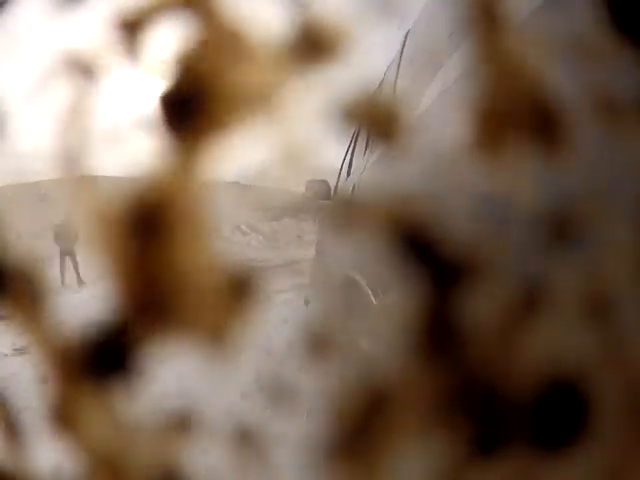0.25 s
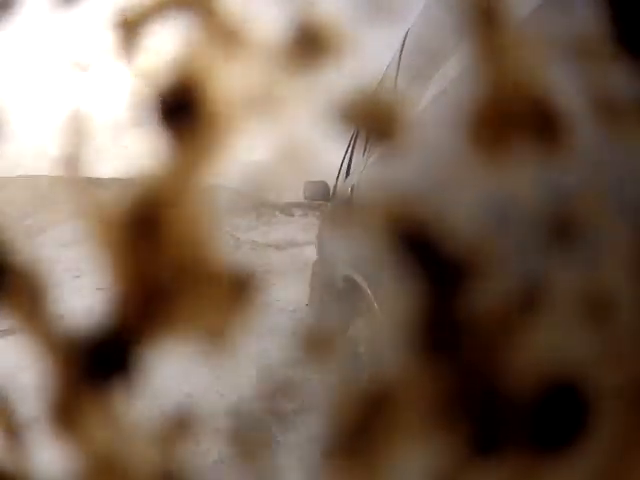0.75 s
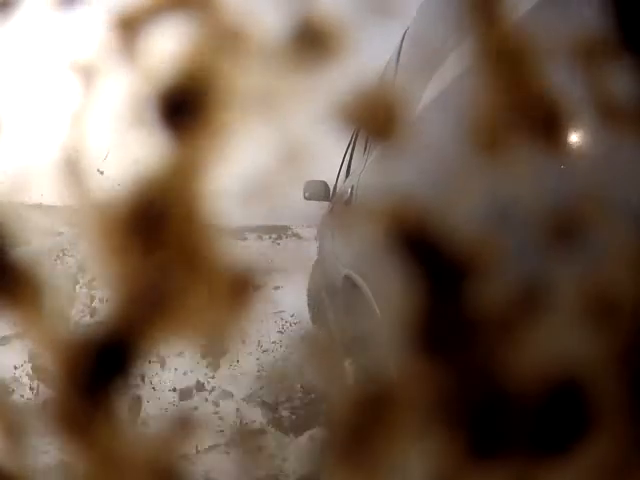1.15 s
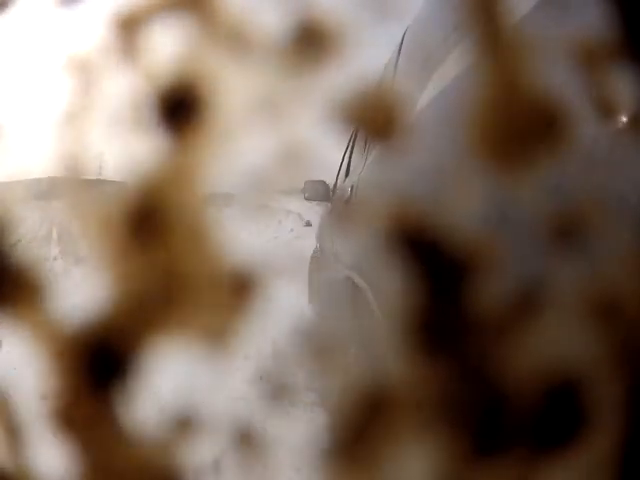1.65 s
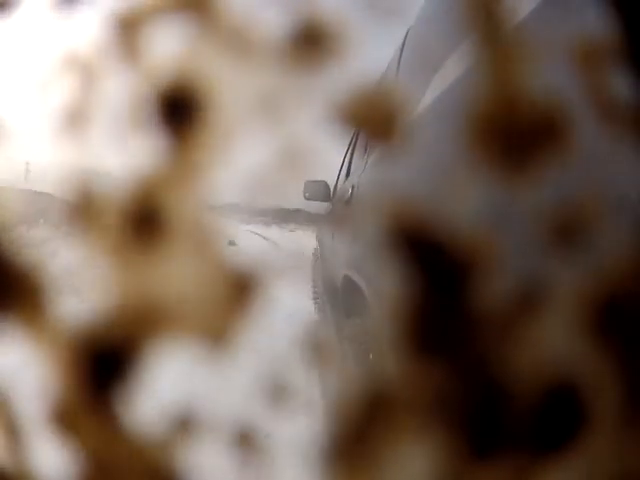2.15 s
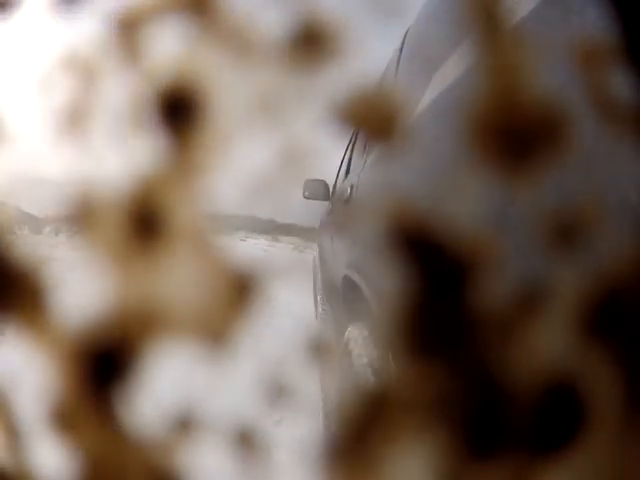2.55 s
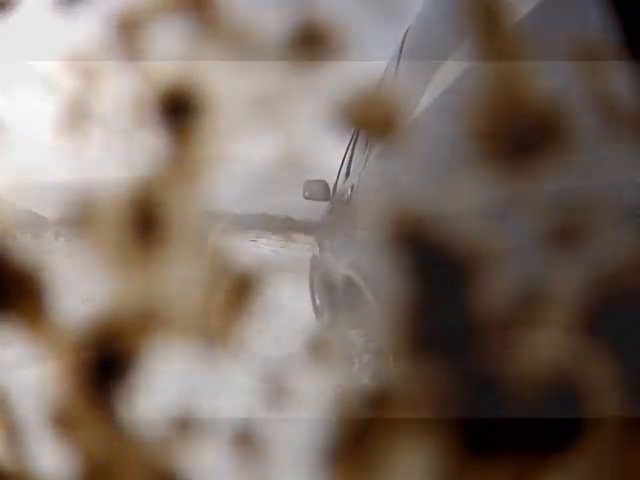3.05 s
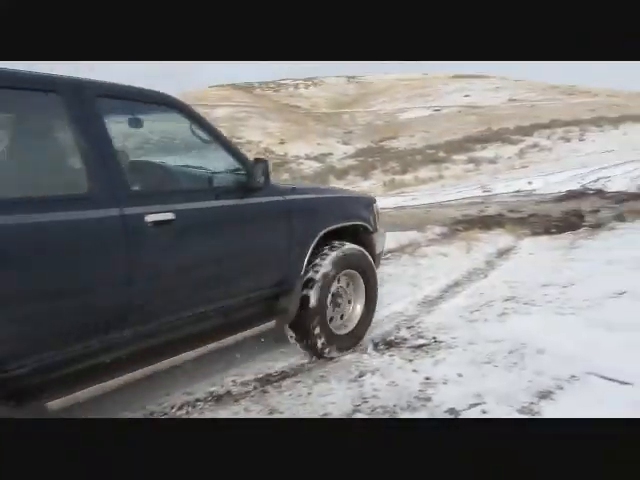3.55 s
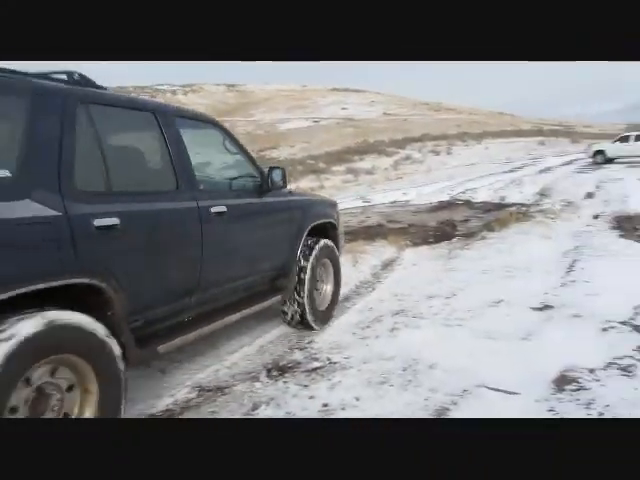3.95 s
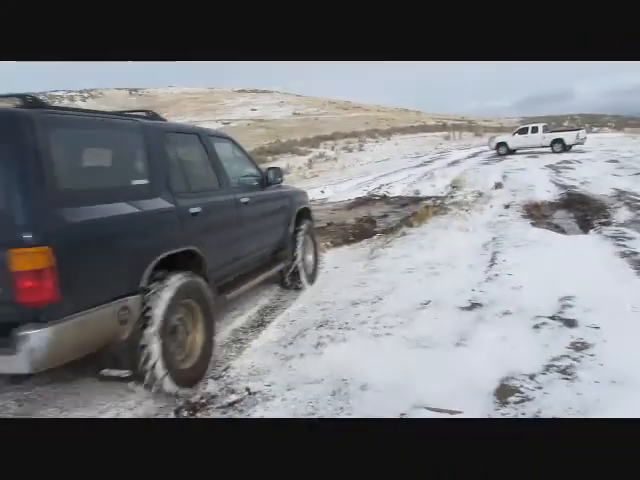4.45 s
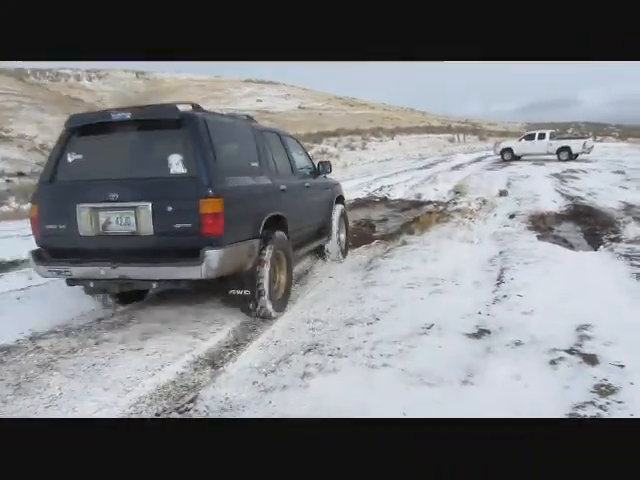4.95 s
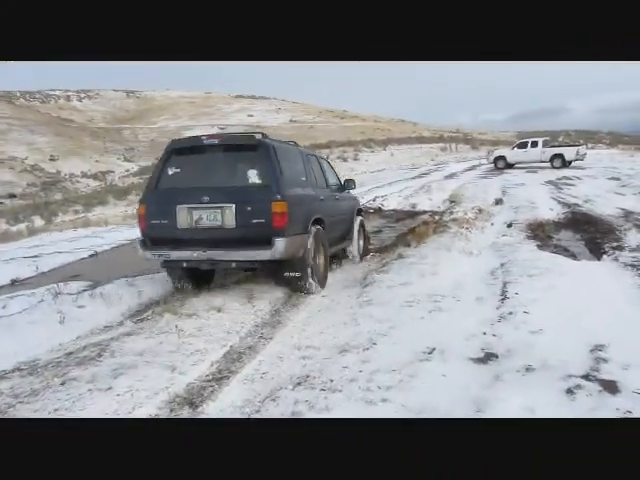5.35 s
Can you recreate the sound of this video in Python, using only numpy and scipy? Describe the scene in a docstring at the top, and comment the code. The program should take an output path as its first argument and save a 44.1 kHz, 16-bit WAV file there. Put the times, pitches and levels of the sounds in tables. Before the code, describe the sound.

A truck ploughs through a mud hole, heard from a boxy microphone mounted on it: resonant rattles, clods thudding, slurry ringing the walls and overloaded bumps in mono. It calms, then a clearer, slightly wide trackside microphone catches tyre roar, slushy hiss, a tiny squeak, belt whirr and the engine pulling away with rising pitch.

```python
"""In a sealed case fixed to a truck's side, then in open air beside the track: a truck ploughs through a mud hole.
On board, swaying noise and an engine drone come through the mount; filtered noise and decaying rings
make the spray, the clods of mud and the rattling case.
Beside the track, coloured noise makes the tyres' roar and slush, with squeaks and a belt whirr; sine tones locked
to the crank make the six-cylinder exhaust, which rises in pitch as the truck pulls away."""
import sys
import numpy as np
from scipy import signal
from scipy.fft import rfft, irfft, next_fast_len
from scipy.io import wavfile
from scipy.ndimage import uniform_filter1d

SR = 44100
rng = np.random.default_rng(int(sys.argv[2]) if len(sys.argv) > 2 else 0)


def output_pcm(signal):
    """Save a mono or channel-first signal as 16-bit PCM at the path in sys.argv[1].

    Samples are clipped to [-1, 1] before scaling.
    """
    pcm = np.clip(np.atleast_2d(signal).T, -1, 1) * 32767
    wavfile.write(sys.argv[1], SR, np.round(pcm).astype(np.int16))


N = 247842

# How hard the ground shakes the truck: t/s, mount sway level/dB, engine drone level/dB, body rumble level/dB
RIDE_LEVELS = [(0, -20.5, -30, -29), (.35, -26, -19.5, -36.5), (.62, -38, -22.5, -40),
               (.8, -16.5, -21.5, -30.5), (1.5, -23, -26, -31.5), (1.85, -19.5, -18.5, -28.5),
               (2.15, -19.5, -22, -40.5), (2.6, -30.5, -32, -49.5), (3.15, -31.5, -37.5, -55),
               (3.4, -45.5, -53.5, -51)]
# Body rumble heard through the mount, its tone colour: f/Hz, relative level/dB
BODY_COLOUR = [(40, -45), (85, 12), (110, -1.5), (140, 0), (180, -9.5), (225, -7), (290, -4.5), (315, -4),
               (350, 0.5), (410, -16), (700, -16.5), (1200, -35.5)]
# Jolts of the suspension: t/s, slow lurch level/dB, boom level/dB
SUSPENSION_JOLTS = [(0.241, -37, -15.5), (0.762, -14.5, -40), (.89, -19, -9), (.995, -7, -6),
                    (1.172, -5, -14), (1.411, -34, -9.5), (1.531, -10.5, -42), (1.629, -17, -13.5),
                    (1.711, -24, -9), (1.808, -27, -17), (2.088, -14, -16), (2.5, -52, -23)]
# Groans and squeals of the flexing mount and case: t/s, length/s, f/Hz, width/Hz, level/dB
MOUNT_GROANS = [(.57, 0.34, 121, 25, -29.5), (1.70, 0.069, 158, 130, -27), (1.885, 0.072, 104, 35, -23.5),
                (1.89, 0.053, 172, 70, -28.5), (2.097, 0.013, 1850, 50, -16.5),
                (2.345, 0.032, 1462, 35, -40.5), (2.99, 0.043, 348, 40, -45)]
# Spray through the mud hole: t/s, level/dB before the case colours it
SPRAY_LEVELS = [(0, -29), (.28, -32.5), (.58, -38), (.9, -34), (1.5, -36.5), (1.88, -26.5), (2.16, -36.5),
                (2.26, -47), (2.75, -58), (3.17, -66)]
# Resonances of the case: f/Hz, width/Hz, relative level/dB
CASE_RESONANCES = [(332, 50, -0.5), (772, 68, -5), (1200, 200, -3.5), (1439, 214, -1.5), (1849, 110, -2),
                   (1966, 150, -2), (2374, 440, -5.5), (3050, 203, -7.5), (3554, 270, -4.5),
                   (3740, 120, -26), (5070, 860, -25.5), (6700, 1500, -25), (8520, 220, -10),
                   (7940, 120, -19.5), (9340, 190, -15.5), (10100, 190, -14), (10530, 97, -14),
                   (11340, 120, -35), (13350, 170, -14.5), (14000, 190, -19.5), (14200, 300, -29.5),
                   (15200, 450, -19.5)]
# Wall modes that ring longest: f/Hz, width/Hz, relative level/dB
WALL_MODES = [(1220, 55, -9), (1340, 40, -6), (1460, 36, -3), (1852, 30, 5), (2010, 50, -2), (2470, 55, -6),
              (2570, 45, -7), (3030, 45, -8), (3190, 45, -9), (3585, 55, -3), (3810, 55, -8),
              (8400, 100, -9), (8800, 100, -16), (9440, 80, -17), (10140, 50, -9), (13870, 55, -12)]
# Gushes of slurry that keep the case ringing: t/s, length/s, level/dB before colouring
SLURRY_GUSHES = [(1.261, 0.069, -29.5), (1.349, 0.049, -30.5), (1.723, 0.012, -27), (1.776, 0.011, -29),
                 (1.873, 0.027, -22.5), (1.942, 0.036, -18.5), (2.013, 0.0077, -11.5), (2.025, 0.021, -23),
                 (2.073, 0.048, -20), (2.118, 0.067, -21.5), (2.296, 0.087, -40.5), (2.919, 0.034, -50.5),
                 (2.956, 0.034, -46.5), (2.995, 0.032, -46.5)]
# Hardest knocks of the case on its mount: t/s, level/dB before colouring,
# middle level/dB and edge level/dB relative to that
HARD_KNOCKS = [(0.222, -7.5, -14.5, -9), (.375, -7.5, -4, -27), (0.5477, -16, -4.5, -3),
               (0.737, -13.5, -8.5, -39), (.761, -10.5, -11.5, -46), (0.8606, -13, -7.5, -35),
               (0.9465, -12.5, -9.5, -36), (.973, -5.5, -13.5, -37), (1.025, -5, -10, -37),
               (1.146, -12, -17, -34), (1.1627, -9.5, -12, -35), (1.2263, -11.5, -11.5, -30),
               (1.244, -11.5, -11, -35), (1.3527, -9.5, -0.5, -21), (1.4371, -13, -6.5, 2.5),
               (1.4779, -9, -12, -35), (1.529, -7, -14, -35), (1.572, -9.5, -14.5, -20),
               (1.5975, -7.5, -6, -18.5), (1.6258, -4, -13, -4), (1.6412, -10, -5, -5),
               (1.691, -16, -14, -30), (1.754, -5.5, -16, -27), (1.8004, -3, -30, -10.5),
               (1.846, 1.5, -25, -16), (1.8573, -7.5, -32, -5.5), (1.8781, -10, -19, -8),
               (1.9359, -7, -1, -33), (2.0127, -7, -7.5, -35), (2.0627, -8, -18, -40),
               (2.0767, -12, -7, -30), (2.1014, -7.5, -21, -15), (2.2243, -18, -28.5, -34.5),
               (2.3073, -20.5, -17.5, -46.5), (2.391, -29, -7.5, -30), (2.4333, -24, -11, -32),
               (2.5522, -34, -18, -4), (2.604, -32, -12, -29), (3.154, -42.5, -15.5, -3.5)]
# Wet clods hitting the case: t/s, relative level/dB, ring f/Hz, ring time to fall 60 dB/s,
# thud level/dB relative to the clod, thud f/Hz, level step/dB from each lump to the next
MUD_CLODS = [(0.3077, 2.5, 910, 0.022, 1.5, 680, -9), (.379, -8, 1330, 0.011, -4.5, 397, -4.5),
             (.4018, -3.5, 2040, 0.018, -24, 350, -16), (0.4603, 6.5, 2074, 0.017, -7, 324, -3),
             (.502, -4.5, 1334, .022, -2, 850, -6), (0.622, 0.5, 1980, 0.004, 5.5, 256, 2),
             (1.1463, -10, 1410, 0.013, -9, 346, -24), (1.3447, -6.5, 1284, 0.018, -8, 330, -19),
             (1.937, -4.5, 1246, 0.018, -10, 318, -27), (2.12, -8.5, 1270, 0.0064, -15, 715, -26)]

# Engine speed beside the track: t/s, crank turning rate f/Hz
CRANK_SPEED = [(3.4, 35.8), (3.75, 36.5), (3.95, 35.7), (4.12, 36.47), (4.54, 40.77), (4.98, 43.55),
               (5.12, 45.02), (5.62, 47.85)]
# The tailpipe comes into view as the throttle opens: t/s, exhaust level/dB before each line's own level
EXHAUST_LOAD = [(3.2, -64), (3.5, -57), (3.92, -52), (4.22, -39.5), (4.55, -38.5), (5.1, -37.5),
                (5.62, -40)]
# Strong low exhaust lines: multiple of the crank rate, relative level/dB
LOW_EXHAUST_LINES = [(2, 32), (3, 23.5), (4, 17)]
# Weaker exhaust lines: multiple of the crank rate, relative level/dB
WEAK_EXHAUST_LINES = [(1.5, -16), (2.5, -27.5), (3.5, 5), (4.5, -29), (5, 2), (5.5, -18.5), (6, -8),
                      (7, 2.5), (8, -1), (9, -6.5), (10, -2.5), (11, -15.5), (12, -10), (13, -7), (14, -27),
                      (15, -8), (17, -10.5), (19, -7)]
# Colour of the muffler and tailpipe: f/Hz, relative level/dB
PIPE_COLOUR = [(60, -14), (200, -2.5), (245, 3.5), (310, -18), (380, 2.5), (430, -25), (490, 10),
               (550, -8.5), (640, 0), (900, -5.5)]
# Wheels pass close by, then roll away: t/s, tyre and fan roar level/dB, slush hiss level/dB
ROLL_LEVELS = [(3.18, -45, -57.5), (3.34, -35, -48), (3.47, -30, -37), (3.56, -31, -43), (3.66, -32, -44.5),
               (3.82, -33, -56), (4.7, -32, -58), (5.35, -32.5, -54.5), (5.6, -29.5, -52.5)]
# Colour of the roar: f/Hz, relative level/dB
ROAR_COLOUR = [(40, -14), (70, 4), (160, 10), (300, 2), (500, 3.5), (750, 2.5), (950, -2), (1300, -1),
               (1800, -5), (2200, -8), (3200, -12.5), (4200, -21), (8000, -32), (15000, -47.5)]
# Colour of the slush hiss: f/Hz, relative level/dB
HISS_COLOUR = [(1500, -3), (3000, 3.5), (4500, 5), (6000, 5.5), (8500, -3), (10500, -12.5), (12500, -17),
               (15500, -18)]
# Ice and stones crunching under the tyres: t/s, relative level/dB, ring f/Hz
TYRE_CRUNCHES = [(3.4538, -27, 3120), (3.5394, -33, 5500), (3.6153, -30.5, 5580), (3.896, -39, 3510),
                 (4.2304, -27.5, 5745), (4.2444, -35, 3886), (4.32, -30.5, 6180), (4.51, -35, 3230),
                 (4.8444, -37, 3156), (5.5533, -22, 4568), (5.573, -29, 2980)]
# Slush squeezed out from under a tyre: t/s, length/s, f/Hz, width/Hz, level/dB
SLUSH_SQUELCHES = [(3.32, 0.057, 750, 300, -40), (3.475, 0.036, 980, 714, -28),
                   (3.657, 0.07, 626, 300, -34.5), (3.79, 0.095, 190, 119.4, -36.5),
                   (4.865, 0.05, 583, 280.4, -31)]
# Thin, very high squeaks from a wheel: t/s, level/dB, length/s
WHEEL_SQUEAKS = [(3.815, -56, .04), (3.853, -41, .06), (4.418, -56, .035), (4.663, -58, .03)]
# Belt in the engine bay: t/s, whirr f/Hz, level/dB
BELT_WHIRR = [(3.6, 2260, -56), (3.8, 2220, -40), (4.0, 2000, -58), (4.15, 1900, -37.5), (4.4, 1900, -55),
              (5.4, 2100, -59), (5.6, 2120, -35.5)]

CHANGE_S = 3.177  # the trackside sound begins here
TOP_HZ = 15500
DRONE_HZ, DRONE_WANDER_HZ = 70.77, 2.37
LURCH_HZ, LURCH_S, BOOM_HZ, BOOM_S = 22, 0.11, 73, 0.032
# Light rattling: level and spread are set against the spray, middle and edge against each knock
RATTLE_PER_S, RATTLE_DB, RATTLE_SPREAD_DB = 34, 13.5, 3
RATTLE_MIDDLE_DB, RATTLE_EDGE_DB = -12, -16.5
GUSH_ATTACK_S, GUSH_HOLD_SHARE = 0.0056, 0.59
THUD_T60_S, LUMP_GAP_S, LUMP_PITCH_RATIO = 0.01, 0.002, 1.088
MUFFLER_HZ, MUFFLER_WIDTH_HZ = 142, 16.3

T = np.arange(N) / SR
SIZE = next_fast_len(N + 16384)
FREQ = np.maximum(np.fft.rfftfreq(SIZE, 1 / SR), 1)


def undb(db):
    """Turn decibels into gain."""
    return 10 ** (np.asarray(db) / 20)


def curves(table):
    """Join each column of a table with straight lines in time."""
    s, *columns = np.transpose(table)
    return [np.interp(T, s, column) for column in columns]


def unit(x):
    """Scale to an rms of 1."""
    return x / np.sqrt(np.mean(x ** 2) + 1e-18)


def noise():
    """White noise: a plain, even hiss."""
    return rng.standard_normal(N)


def walk(rate):
    """Random values, so many a second, joined by straight lines; rms 1."""
    steps = T * max(rate, 1)
    count = int(steps[-1]) + 2
    return unit(np.interp(steps, np.arange(count), rng.standard_normal(count)))


def steady(x, seconds):
    """Even out swells slower than about the given time; local rms about 1."""
    k = max(int(seconds * SR / 2), 1)
    power = uniform_filter1d(uniform_filter1d(x ** 2, k), k)
    return x / np.sqrt(np.abs(power) + 1e-18)


def shape(points):
    """Gain over frequency, drawn through (f/Hz, level/dB) points."""
    hz, db = np.transpose(points)
    return undb(np.interp(np.log(FREQ), np.log(hz), db))


def bell(hz, width, at_hz=FREQ):
    """Gain over frequency of one resonance."""
    return 1 / np.sqrt(1 + ((at_hz ** 2 - hz ** 2) / (at_hz * width)) ** 2)


def colour(x, gain):
    """Filter with the given gain over frequency, so that no sound comes before its cause."""
    cepstrum = irfft(np.log(gain + 1e-6), SIZE)
    # folding the second half onto the first gives the filter with the least delay
    cepstrum[1:SIZE // 2] *= 2
    cepstrum[SIZE // 2 + 1:] = 0
    return irfft(rfft(x, SIZE) * np.exp(rfft(cepstrum)), SIZE)[:N]


def fade(t60, count=6000):
    """A smooth decay that falls 60 dB in t60 seconds."""
    return np.exp(-np.log(1000) * T[:count] / t60)


def ring(hz, t60, count=6000):
    """One note of a struck object, dying away."""
    return np.sin(2 * np.pi * hz * T[:count]) * fade(t60, count=count)


def burst(t60, count=6000):
    """A dying burst of noise with energy 1."""
    x = rng.standard_normal(count) * fade(t60, count=count)
    return x / np.linalg.norm(x)


def add(out, s, x):
    """Mix x into out from time s."""
    i = max(int(s * SR), 0)
    out[i:i + len(x)] += x[:max(N - i, 0)]


def scattered_drops(grain_rate, scatter_db):
    """Single clicks at random moments, with random strengths."""
    hits = rng.random(N) < grain_rate / SR
    return hits * undb(scatter_db * np.minimum(rng.exponential(size=N), 4))


def heave(s, hz, length):
    """A few swings that build up and die away around time s."""
    return np.exp(-((T - s) / length) ** 2) * np.cos(2 * np.pi * hz * (T - s))


def swells(table):
    """Squelches and groans: short swells of noise, each around its own pitch."""
    total = np.zeros(N)
    for s, length, hz, width, db in table:
        band = irfft(rfft(noise(), SIZE) * bell(hz, width) ** 2, SIZE)[:N]
        total += undb(db) * np.exp(-((T - s) / length) ** 2) * steady(band, 0.12)
    return total


def belt():
    """A belt in the engine bay whirrs: a gliding tone, roughened by fast random changes in strength."""
    hz, db = curves(BELT_WHIRR)
    return undb(db) * walk(480) * np.sin(2 * np.pi * np.cumsum(hz) / SR)


def brake():
    """A brake pad grazes its disc and squeaks: short, very high tones with an unsteady pitch."""
    gate = np.zeros(N)
    for s, db, length in WHEEL_SQUEAKS:
        gate += undb(db) * np.interp(T, [s, s + length / 10, s + length], [0, 1, 0])
    return gate * np.sin(2 * np.pi * np.cumsum(13250 + 35 * walk(300)) / SR)


def case_response(null_hz=6000, null_width=900, upper_null_hz=12000, upper_null_width=1700):
    """The sealed case passes its wall resonances and weakens two bands."""
    power = sum((undb(db) * bell(hz, width)) ** 2 * bell(hz, 5 * width) for hz, width, db in CASE_RESONANCES)
    lower_null = 1 - .985 * bell(null_hz, null_width) ** 2
    upper_null = 1 - .9 * bell(upper_null_hz, upper_null_width) ** 2
    return unit(np.sqrt(power * lower_null * upper_null))


def spray(case, grain_rate=700, scatter_db=1.0):
    """Drops thrown by the front tyre patter on the case in random flurries."""
    level_db, = curves(SPRAY_LEVELS)
    drops = scattered_drops(grain_rate, scatter_db) * rng.choice([-1, 1], N)
    flurries_db = 2.6 * walk(110) + 1.2 * walk(25)
    patter = steady(unit(drops) + undb(8) * noise(), 0.24) * undb(level_db + flurries_db)
    tint = shape([(300, 2.5), (1000, 0.5), (3500, -4.5), (8000, -3.5), (15000, -1.0)])
    return colour(patter, case * tint)


def gushes(case, ring_db=0, rub_db=-7, rough_db=4):
    """Dense slurry rubs the case; the narrow wall modes build up and ring through it."""
    gate = np.zeros(N)
    for s, length, db in SLURRY_GUSHES:
        points_s = [0, GUSH_ATTACK_S, GUSH_HOLD_SHARE * length, length]
        gate += undb(db) * np.interp(T - s, points_s, [0, 1, 1, 0])
    modes = np.sqrt(sum((undb(db) * bell(hz, width) * bell(hz, 7 * width)) ** 2 for hz, width, db in WALL_MODES))
    rubbing = noise() * gate * undb(rough_db * walk(170))
    return colour(rubbing, np.hypot(undb(ring_db) * unit(modes), undb(rub_db) * case))


def rattle():
    """Light knocks at random moments, following the spray level; rows like those of the hard knocks."""
    when, size = rng.random((int(RATTLE_PER_S * CHANGE_S), 2)).T
    s = (np.arange(len(when)) + when) / RATTLE_PER_S
    spread_db = RATTLE_SPREAD_DB * np.sqrt(3) * (2 * size - 1)
    db = np.interp(s, *np.transpose(SPRAY_LEVELS)) + RATTLE_DB + spread_db
    return [(at, knock_db, RATTLE_MIDDLE_DB, RATTLE_EDGE_DB) for at, knock_db in zip(s, db)]


def knocks(case):
    """The case knocks on its mount: a hard tick and a short scrape, with its own share of middle and edge."""
    ticks, middles, edges = np.zeros((3, N))
    for s, db, middle_db, edge_db in HARD_KNOCKS + rattle():
        contact = burst(.01) + undb(-7) * burst(.035)
        add(ticks, s + 0.00069, undb(db) * contact)
        add(middles, s + 0.001072, undb(db + middle_db) * contact)
        add(edges, s + .001, undb(db + edge_db) * burst(0.016))
    bright_tint = shape([(300, -17), (1500, -23.0), (2400, -6.0), (3300, 5), (8000, 3.5), (15000, 0.5)])
    middle_tint = shape([(300, -5.5), (1200, -8), (2200, 4.5), (3200, -28.0), (6000, -40.5)])
    edge_tint = shape([(2500, -20), (4500, 1.5), (5500, 1.5), (6000, -44.5), (6500, 0.0), (7800, -3.5),
                       (10500, -28.0), (12000, -31.5), (14000, -25.0)])
    bright = colour(ticks, case * bright_tint)
    middle = colour(middles, case * middle_tint)
    edge = colour(edges, edge_tint)
    return undb(10) * bright + undb(22) * middle + undb(20.5) * edge


def clods(case, wall_hz=352, wall_t60=0.11):
    """A clod slaps the case: a brief ring, a thud and a longer wall hum; two more lumps trail it."""
    slaps, splats = np.zeros((2, N))
    for s, db, hz, t60, thud_db, thud_hz, trail_db in MUD_CLODS:
        thud = ring(thud_hz, THUD_T60_S) + undb(-12) * ring(wall_hz, wall_t60)
        add(slaps, s, undb(db + thud_db) * thud)
        for k in range(3):
            at = s + k * LUMP_GAP_S
            size = undb(db + k * trail_db)
            add(slaps, at, size * ring(hz * LUMP_PITCH_RATIO ** k, t60))
            add(splats, at, size * (burst(0.011) + undb(-4.5) * burst(0.072)))
    return slaps + undb(12) * colour(splats, case ** 0.67)  # the power softens the case's peaks


def mount(sway_hz=21.62, sway_width=7):
    """The mount sways on bumps and carries engine drone and body rumble; jolts make it lurch and boom."""
    sway_db, drone_db, body_db = curves(RIDE_LEVELS)
    sway = steady(colour(noise(), bell(sway_hz, sway_width) ** 2), 0.035)
    drone_tone = np.sin(2 * np.pi * np.cumsum(DRONE_HZ + DRONE_WANDER_HZ * walk(10.07)) / SR)
    drone_noise = colour(noise(), bell(66.6, 19) ** 2)
    drone = steady(unit(drone_tone) + undb(0.5) * unit(drone_noise), 0.31)
    body = steady(colour(noise(), shape(BODY_COLOUR)), 0.023)
    jolts = np.zeros(N)
    for s, lurch_db, boom_db in SUSPENSION_JOLTS:
        jolts += undb(lurch_db) * heave(s, LURCH_HZ, LURCH_S)
        jolts += undb(boom_db) * heave(s, BOOM_HZ, BOOM_S)
    return undb(sway_db) * sway + undb(drone_db) * drone + undb(body_db) * body + jolts


def tyres(turn, throb=0.12, grain_rate=1500, scatter_db=-1.0):
    """Fan, gas and tread roar throb once per crank turn; wet snow fizzes and crunches under the tyres."""
    roar_db, hiss_db = curves(ROLL_LEVELS)
    roar = unit(colour(noise(), shape(ROAR_COLOUR))) * (1 + throb * np.sin(turn))
    roar = roar * undb(roar_db + 1.3 * walk(40))
    grains = scattered_drops(grain_rate, scatter_db) * noise()
    fizz = unit(unit(grains) + noise()) * undb(hiss_db)
    crunch = np.zeros(N)
    for s, db, hz in TYRE_CRUNCHES:
        add(crunch, s, undb(db + 24.5) * burst(0.1) + undb(db - 6.5) * ring(hz, 0.076))
    return roar + colour(fizz, unit(shape(HISS_COLOUR))) + colour(crunch, bell(3980, 5600) ** 3)


def exhaust():
    """Three firings a turn; unequal cylinders add lines that climb through the pipe's resonances."""
    crank_hz, = curves(CRANK_SPEED)
    load_db, = curves(EXHAUST_LOAD)
    turn = 2 * np.pi * np.cumsum(crank_hz * (1 + 0.0025 * walk(24.64))) / SR
    lines = []
    # each low line swells as it crosses the muffler's boom
    for order, db in LOW_EXHAUST_LINES:
        boom_db = 20 * np.log10(bell(MUFFLER_HZ, MUFFLER_WIDTH_HZ, order * crank_hz))
        lines.append((order, db + boom_db + 1.4 * walk(25)))
    for order, db in WEAK_EXHAUST_LINES:
        pipe_db = np.interp(order * crank_hz, *np.transpose(PIPE_COLOUR))
        lines.append((order, db + pipe_db + 2 * walk(9)))
    tone = np.zeros(N)
    for order, db in lines:
        # uneven burning smears the high lines most
        phase = order * turn + .04 * order * walk(32)
        tone += undb(load_db + db) * np.sin(phase)
    # firings vary more in strength until the engine pulls firmly
    unevenness_db = np.interp(crank_hz, [37, 43], [1.2, .2])
    tone = tone * undb(unevenness_db * walk(50))
    return np.sqrt(2) * tone, turn


def scene():
    """The ride on the truck, in mono, gives way to the trackside view with a little width."""
    case = case_response()
    on_board = mount() + swells(MOUNT_GROANS) + spray(case) + gushes(case) + knocks(case) + clods(case)
    on_board = on_board * np.interp(T, [3.2, 3.45], [1, 0])
    tone, turn = exhaust()
    tone = tone * np.interp(T, [3.2, 3.45], [0, 1])
    open_air = np.clip((T - CHANGE_S) / 0.0044, 0, 1)
    air_hiss = undb(-75) * noise()
    outside = (tone + tyres(turn) + swells(SLUSH_SQUELCHES) + belt() + brake() + air_hiss) * open_air
    # sound reaches the left first; this lead shrinks as the truck leaves
    lead_s = np.interp(T, [3.7, 4.3, 5], [6.5e-5, 4e-5, 2.2e-5])
    direction = 0.5 * (np.interp(T + lead_s, T, outside) - np.interp(T - lead_s, T, outside))
    # slightly louder on the left, then a touch louder on the right
    balance = np.interp(T, [4.3, 4.7], [.035, -.01]) * outside
    # the ground scatters a little of the exhaust and the tyres
    scattered_exhaust = undb(-18.0) * np.interp(T - .002, T, tone)
    scattered_tyres = undb(-12.5) * tyres(turn) * open_air
    side = direction + balance + scattered_exhaust + scattered_tyres
    return on_board + outside + np.array([side, -side])


def duck(x, release_s=0.036, depth=6.4):
    """Gain control: an overload turns the gain down 5 ms later; it recovers quickly."""
    overload = np.clip(np.abs(x).max(axis=0) - 1, 0, 1)
    keep = np.exp(-1 / (release_s * SR))
    held = signal.lfilter([1000 / SR], [1, -keep], overload)
    return x / (1 + depth * np.interp(T - .005, T, np.tanh(held)))


def record(dry):
    """Blows that overload the input duck the gain; peaks are softly clipped and the top is cut."""
    loud = duck(dry)
    clipped = loud / (1 + loud ** 6) ** (1 / 6)
    top_cut = signal.ellip(8, .2, 70, TOP_HZ, fs=SR, output="sos")
    return signal.sosfilt(top_cut, clipped)


dry = scene()
out = record(dry)
output_pcm(out)
```